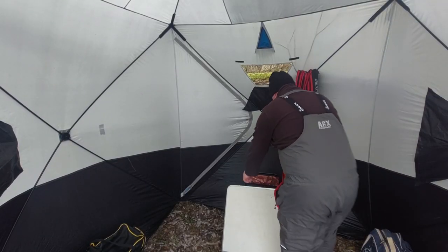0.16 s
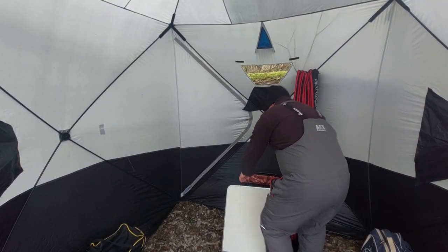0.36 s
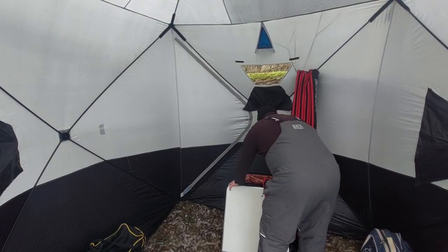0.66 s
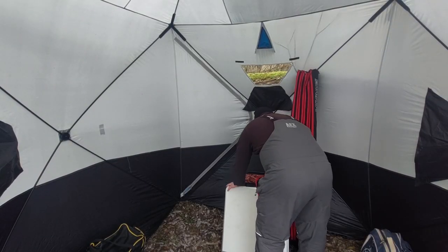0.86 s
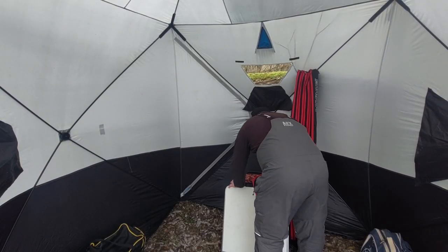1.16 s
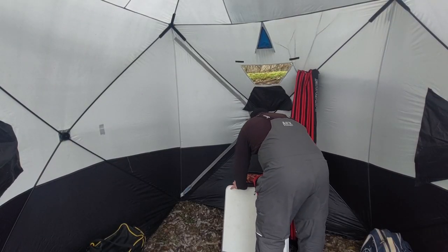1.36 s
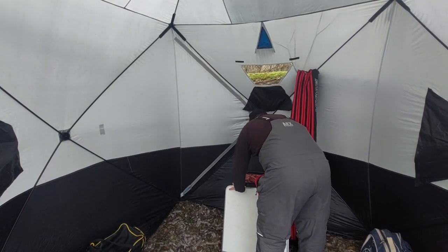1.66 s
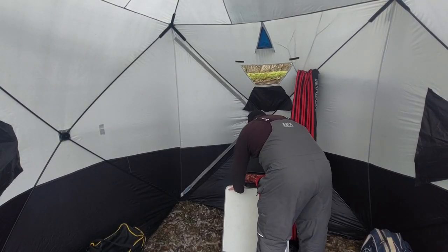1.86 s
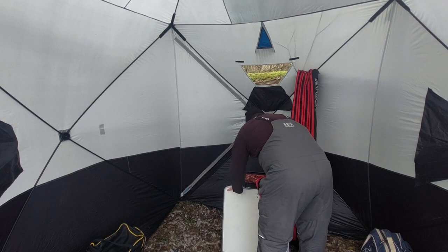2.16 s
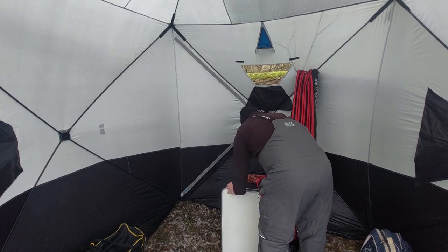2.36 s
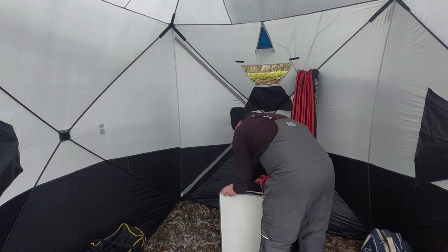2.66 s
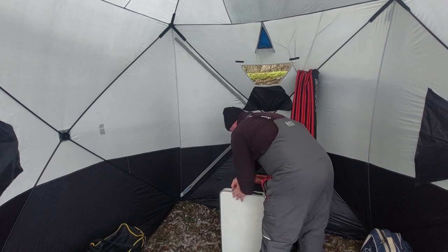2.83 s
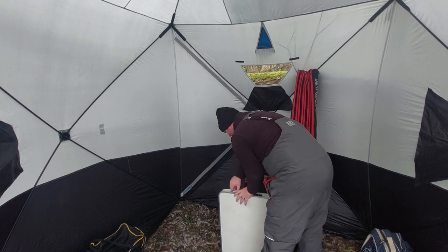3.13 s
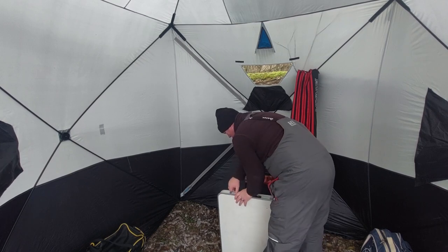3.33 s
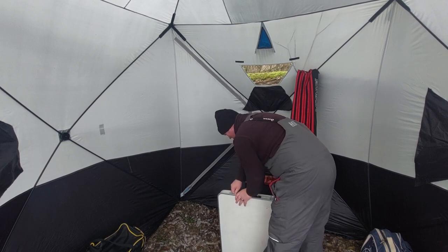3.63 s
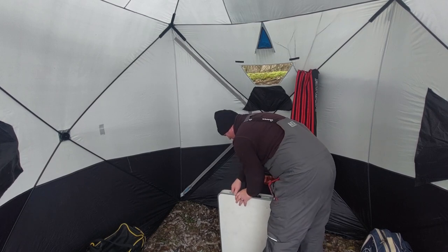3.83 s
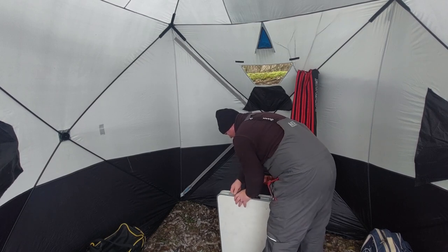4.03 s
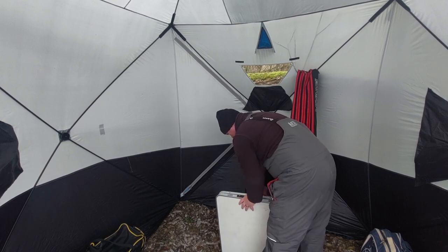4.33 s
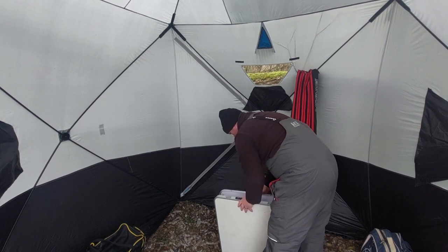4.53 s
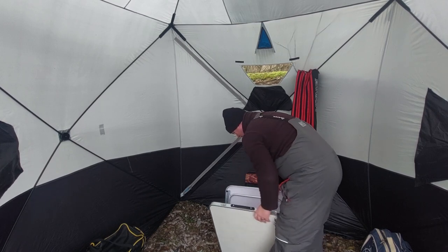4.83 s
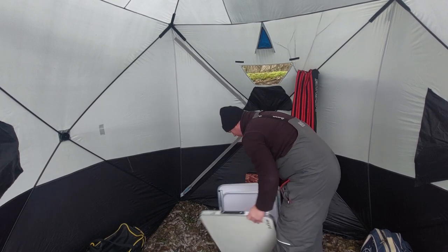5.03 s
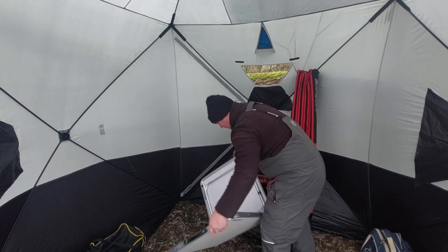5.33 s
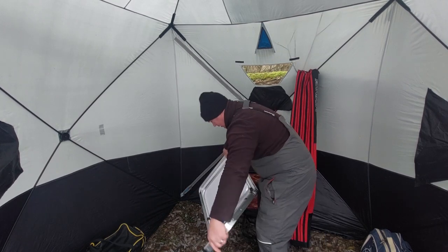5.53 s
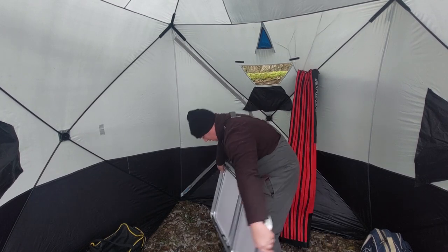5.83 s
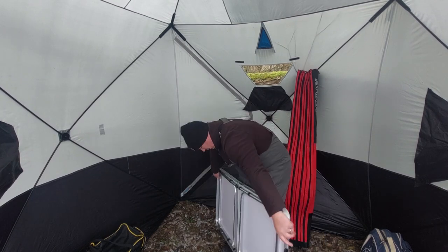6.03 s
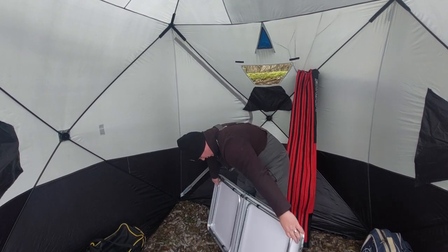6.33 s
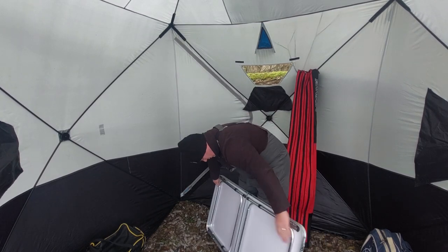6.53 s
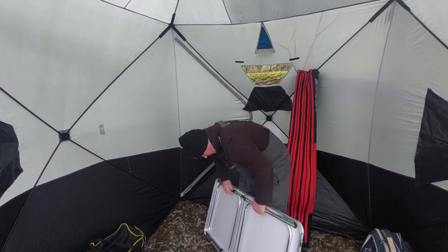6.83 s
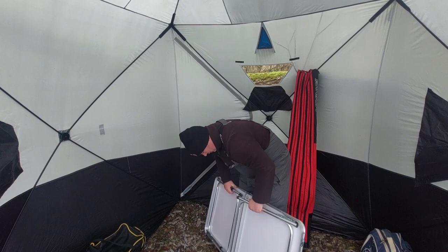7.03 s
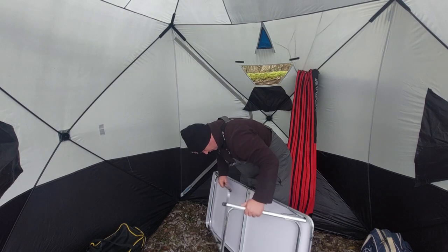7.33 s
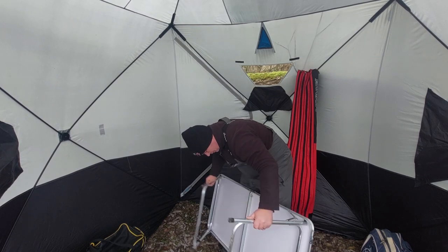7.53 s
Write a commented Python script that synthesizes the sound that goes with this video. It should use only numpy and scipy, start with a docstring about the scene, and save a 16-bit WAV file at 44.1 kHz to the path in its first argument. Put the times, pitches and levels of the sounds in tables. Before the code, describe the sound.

Inside a small tent, overalls swish and hands rub and knock hollow table panels. The folded table is set down with a dull double thud. After quiet fumbling its latch snaps loudly, the halves scrape open with a thin squeal and slam on their stops, then legs click and rattle. Close dry walls, near-mono camera microphone, very faint low background.

```python
"""Sleeves and hands brush and knock hollow panels, then a folded table is set down, unlatched and swung open in a tent.
Each blow is a set of decaying modes over bands of fading noise, with a short noise burst for the close fabric walls.
Cloth, hands and scraping edges are noise made of tiny slips; fittings click, and low noise swells as weight shifts.
Nearly mono over a faint floor; the right channel has a noise suppressor and the extreme treble differs between sides."""
import sys
import numpy as np
from scipy import signal
from scipy.fft import rfft, irfft, next_fast_len
from scipy.io import wavfile
from scipy.ndimage import uniform_filter1d

SR = 44100
rng = np.random.default_rng(int(sys.argv[2]) if len(sys.argv) > 2 else 0)


def unload_audio(sound):
    """Save the sound as a 16-bit wav file, at the path given as the first command line argument."""
    columns = np.transpose(np.atleast_2d(sound))
    # keep every value between -1 and 1, then stretch to whole-number steps
    steps = np.round(np.clip(columns, -1, 1) * 32767)
    wavfile.write(sys.argv[1], SR, steps.astype(np.int16))


N = 338688
TIME = np.arange(N) / SR


def undb(db):
    """Decibels to gain."""
    return np.exp(np.asarray(db) * np.log(10) / 20)


def unit(x):
    """Scale to rms 1."""
    return x / np.sqrt(np.mean(x ** 2))


def along(table):
    """Draw each column of a timed curve as automation, one value per sample."""
    s, *columns = np.transpose(table)
    return [np.interp(TIME, s, column) for column in columns]


def at_hz(points, hz):
    """Read (Hz, value) points on a log-frequency axis."""
    point_hz, value = np.transpose(points)
    return np.interp(np.log(np.maximum(hz, 1)), np.log(point_hz), value)


def colour(x, points):
    """EQ with the given (Hz, dB) curve, made minimum-phase so that nothing sounds early."""
    size = next_fast_len(len(x) + 4096, True) // 2 * 2
    curve_db = at_hz(points, np.fft.rfftfreq(size, 1 / SR))
    cepstrum = irfft(np.log(undb(curve_db)))
    # fold the cepstrum onto positive time
    cepstrum[1:size // 2] *= 2
    cepstrum[size // 2 + 1:] = 0
    response = np.exp(rfft(cepstrum))
    return irfft(rfft(x, size) * response)[:len(x)]


def band_filter(edges_hz, order):
    """Causal band-pass between two edges."""
    return signal.butter(order, edges_hz, "band", fs=SR, output="sos")


def resonance(x, hz, q):
    """One resonance with gain 1 at its centre."""
    b, a = signal.iirpeak(hz, q, fs=SR)
    return signal.lfilter(b, a, x)


def walk(rate):
    """Smooth random drift with spread near 1, taking a new direction `rate` times a second."""
    k = int(SR / rate)
    steps = np.repeat(rng.standard_normal(N // k + 1), k)
    return unit(uniform_filter1d(steps, k)[:N])


def add(track, s, sound):
    """Mix a sound in at a time."""
    i = int(s * SR)
    track[i:i + len(sound)] += sound[:N - i]


# tone of the faint floor: frequency_hz, level_db
FLOOR_TONE = [(20, -15.5), (55, 5.5), (100, 1), (180, -0.5), (350, -1), (800, -16), (2000, -31),
              (5000, -40.5), (10000, -24.5), (15000, -36)]
FLOOR_DB = -58.5


def faint_floor():
    """Steady noise, weighted to the bass."""
    return undb(FLOOR_DB) * unit(colour(rng.standard_normal(N), FLOOR_TONE))


def reflected(x):
    """Ground and walls add three early echoes whose paths drift as the body moves."""
    index = np.arange(N)
    out = x.copy()
    for lag_s in (.0017, .0041, .0083):
        lag = (lag_s * SR * (1 + .06 * walk(3))).astype(int)
        out += .25 * x[index - lag]
    return out


def friction(rate, spread_db, flutter_db, smear_s, wet):
    """Countless little slips of uneven size, in spurts; the tent walls smear each into a short hiss."""
    slipping = rng.random(N) < rate / SR
    size_db = spread_db * np.minimum(rng.exponential(size=N), 5)
    slips = slipping * rng.standard_normal(N) * undb(size_db)
    slips *= undb(flutter_db * walk(70))
    # each slip leaves an exponentially fading power that drives the hiss
    lingering = signal.lfilter([1], [1, -np.exp(-1 / (smear_s * SR))], slips ** 2)
    hiss = np.sqrt(lingering) * rng.standard_normal(N)
    return reflected(unit(slips) + wet * unit(hiss))


RELEASE_RATIO = 1.12  # a swell dies this much slower than it grows


def swells(base_db, events):
    """Gain of a base level plus (peak_s, swell_s, level_db) movements that grow, round off and die away."""
    power = undb(base_db) ** 2
    for s, swell_s, db in events:
        age = (TIME - s) / swell_s
        near = abs(age) < 10
        shape_age = np.minimum(age[near], age[near] / RELEASE_RATIO)
        power[near] += (undb(db) / np.cosh(shape_age)) ** 2
    return np.sqrt(power)


# tone of cloth, of hands rubbing and of the ground: frequency_hz, level_db
SWISH_TONE = [(400, -22), (750, -8.5), (1300, -10.5), (2000, -6.5), (3200, -6.5), (4300, -4), (5400, -10),
              (6600, -10.5), (8400, -11.5), (10400, -18.5), (12500, -30.5), (16000, -38)]
RUB_TONE = [(50, -18), (90, -11), (150, 2), (400, 0.5), (620, 3), (1150, -4), (1600, -4), (2400, -18),
            (4000, -73)]
GROUND_TONE = [(20, -18), (38, -17), (55, 2.5), (75, -0.5), (110, -41), (200, -45)]
# how busily the body moves: time_s, cloth_swish_db, hand_rub_db
EFFORT = [(0.0, -56.5, -55), (0.7, -53, -56.5), (1.1, -59, -56.5), (1.55, -58.5, -53.5), (1.82, -68, -68),
          (2.03, -67, -64), (2.22, -58, -59.5), (3.0, -62.5, -66), (3.45, -60, -66.5), (3.8, -57.5, -56.5),
          (4.05, -61.5, -58), (4.45, -61, -66), (4.62, -52, -63.5), (4.78, -46.5, -51), (5.3, -52.5, -59.5),
          (6.7, -53, -58.5), (7.1, -53.5, -67), (7.68, -50, -55)]
# single sweeps of a sleeve or hand: peak_s, swell_s, cloth_swish_db, hand_rub_db
STROKES = [(0.005, 0.0053, -47.5, -37.5), (0.314, 0.042, -39.5, -44), (0.445, 0.035, -41, -51.5),
           (0.598, 0.018, -39, -41), (0.655, 0.017, -45.5, -70), (1.625, 0.03, -50, -53),
           (2.36, 0.037, -58.5, -55), (2.78, 0.034, -61, -53), (2.9, 0.028, -56.5, -54.5),
           (3.095, .02, -60, -55.5), (4.978, 0.028, -40.5, -40.5), (5.46, 0.071, -48, -58),
           (5.819, 0.059, -43.5, -56), (5.9, 0.01, -47, -69), (6.61, 0.075, -50, -74),
           (6.815, 0.024, -45, -46), (6.915, 0.026, -36, -41.5), (7.21, 0.016, -49, -47),
           (7.368, 0.033, -37.5, -66), (7.513, 0.02, -36, -50)]
# weight of boots or table coming onto the ground: peak_s, swell_s, level_db
THUMPS = [(0.005, 0.072, -50), (0.375, 0.053, -45), (0.65, 0.023, -43), (1.485, .03, -46),
          (3.655, 0.016, -36.5), (5.04, 0.065, -48), (6.06, 0.063, -45.5), (6.38, 0.042, -37),
          (6.96, 0.055, -50.5)]
SHUFFLE_DB = -12  # steady rumble of the feet, relative to the rub of the hands


def handling():
    """Overalls swish and hands rub in tiny slips; low noise swells as the ground takes the weight."""
    swish_db, rub_db = along(EFFORT)
    swish_slips = friction(rate=4500, spread_db=2.5, flutter_db=1.4, smear_s=0.007, wet=1.34)
    rub_slips = friction(rate=700, spread_db=2.0, flutter_db=2.0, smear_s=0.016, wet=0.99)
    swish = unit(colour(swish_slips, SWISH_TONE))
    rub = unit(colour(rub_slips, RUB_TONE))
    tread = unit(colour(rng.standard_normal(N), GROUND_TONE))
    swish_strokes = [(s, swell_s, db) for s, swell_s, db, _ in STROKES]
    rub_strokes = [(s, swell_s, db) for s, swell_s, _, db in STROKES]
    return (swish * swells(swish_db, swish_strokes)
            + rub * swells(rub_db, rub_strokes)
            + tread * swells(rub_db + SHUFFLE_DB, THUMPS))


# fingertips shifting their grip at random; level relative to the rub of the hands
FINGERS_PER_S, FINGER_DB, FINGER_SPREAD_DB = 6, 0, 3.5
# soft skin leaves the treble quiet
FINGER_SPOT_HZ, FINGER_FALL_DB_PER_OCTAVE, FINGER_RISE_S = 700, 5, .004


def fingers():
    """Faint random taps of the grip, stronger when the hands are busy."""
    out = np.zeros(N)
    _, rub_db = along(EFFORT)
    for when, strength, spot in rng.uniform(-1, 1, (int(FINGERS_PER_S * N / SR), 3)):
        i = int(abs(when) * (N - 1))
        db = rub_db[i] + FINGER_DB + FINGER_SPREAD_DB * strength
        spot_hz = FINGER_SPOT_HZ * 2 ** (2 * spot)  # up to two octaves either way
        add(out, i / SR, tap(db, spot_hz, FINGER_FALL_DB_PER_OCTAVE, FINGER_RISE_S))
    return out


def tap(db, spot_hz, fall_db, rise):
    """A light contact, damped by the hands: the parts tuned nearest the struck spot answer most."""
    centres_hz = np.sqrt(np.multiply(PART_EDGES_HZ[:-1], PART_EDGES_HZ[1:]))
    parts_db = db - fall_db * abs(np.log2(centres_hz / spot_hz))
    return blow(parts_db, rise, spot_hz, spot_db=3, crack=37, early_db=6.0, modes_db=-32.5,
                longest_t60=0.21, size=SR // 8)


# hands and knees knocking on the hollow panels: start_s, level_db, struck_spot_hz, contact_rise_s
KNOCKS = [(0.052, -47.5, 1030, .002), (0.088, -49, 890, 0.0011), (0.167, -46, 1250, 0.00045),
          (0.461, -42, 1300, 0.0021), (0.721, -50, 260, 0.0014), (1.265, -41, 258, 0.0037),
          (1.274, -58, 1100, 0.0057), (1.322, -50.5, 900, 0.0014), (1.559, -42.5, 250, 0.011),
          (2.129, -53, 171, 0.003), (2.33, -43.5, 372, 0.0032), (3.296, -46, 234, 0.00096),
          (3.687, -36, 480, 0.0054), (4.025, -58, 960, 0.0013), (4.066, -56, 660, .004),
          (4.143, -39, 530, 0.00068), (4.412, -44.5, 171, 0.0017), (4.783, -46, 434, 0.002),
          (4.868, -43.5, 151, 0.0011), (5.133, -41.5, 175, 0.00023), (5.552, -49, 410, 0.00047),
          (6.67, -44, 404, 0.0025), (6.856, -43, 150, 0.0047), (6.982, -43.5, 150, .002),
          (7.04, -38, 326, 0.0024), (7.477, -34.5, 167, 0.0017)]
KNOCK_FALL_DB_PER_OCTAVE = 6.5
# catches, braces and leg tubes clicking:
# start_s, level_db, struck_spot_hz, fall_db_per_octave (away from the spot), contact_rise_s
CLICKS = [(1.313, -55, 4360, 23, 0.0022), (2.547, -62.5, 1510, 4, 0.00037), (3.544, -46, 2430, 4.5, .0008),
          (3.714, -49, 4360, 22, 0.0019), (3.84, -44, 6490, 3, 0.0033), (3.952, -49, 4910, 9.5, 0.0019),
          (4.113, -44.5, 5900, 4, 0.009), (4.463, -62, 4320, 3.5, .003), (4.542, -62, 4360, 0, 0.0019),
          (4.598, -56, 586, 4.5, .003), (4.693, -41, 4320, 4.5, 0.0038), (4.711, -41, 4380, 5.5, 0.021),
          (4.951, -42, 2930, 5, 0.00025), (4.968, -39.5, 4770, 8, 0.0013), (5.004, -39, 3130, 13, 0.0011),
          (5.318, -47, 4630, 6, 0.0013), (5.682, -53.5, 8900, 1.5, 0.0013), (6.656, -42.5, 4130, 5, 0.0017),
          (6.851, -39, 4170, 4.5, 0.0045), (6.98, -39.5, 1960, 2.5, 0.0024),
          (7.033, -45.5, 1970, 2.5, 0.0033), (7.119, -46, 4800, 5.5, 0.0012),
          (7.175, -35.5, 1500, 7, 0.002), (7.228, -37, 3400, 6, 0.0017), (7.345, -38, 5700, 3.5, 0.0011),
          (7.474, -39.5, 2340, 0.5, 0.0027), (7.507, -41, 13000, 11, .005)]


def taps():
    """Knocks on the panels and clicks of the metal fittings, each a short damped ring."""
    out = np.zeros(N)
    for s, db, spot_hz, rise in KNOCKS:
        add(out, s, tap(db, spot_hz, KNOCK_FALL_DB_PER_OCTAVE, rise))
    for s, db, spot_hz, fall_db, rise in CLICKS:
        add(out, s, tap(db, spot_hz, fall_db, rise))
    return out


# the halves sliding on each other: time_s, level_db
SLIDE = [(5.955, -50), (5.975, -24), (6.06, -27.5), (6.115, -29), (6.135, -34), (6.2, -36), (6.25, -33),
         (6.3, -40.5), (6.33, -46)]
# tone of the scraping edges: frequency_hz, level_db
SCRAPE_TONE = [(60, -15), (130, -0.5), (250, -12), (550, -6), (1200, -6.5), (2500, -7), (4600, -5),
               (5600, -10.5), (8500, -10), (10500, -22.5), (13000, -26.5), (16000, -45.5)]


def scrape():
    """The edges stick and slip only while the halves open, with a thin, broken metallic squeal."""
    slide_db, = along(SLIDE)
    sliding = (TIME > SLIDE[0][0]) & (TIME < SLIDE[-1][0])
    slips = friction(rate=2600, spread_db=2.4, flutter_db=1.2, smear_s=0.0061, wet=1.15)
    grind = unit(colour(slips, SCRAPE_TONE))
    squeal = unit(signal.sosfilt(band_filter([8680, 8880], 4), rng.standard_normal(N)))
    squeal *= np.exp(-((TIME - 6.125) / .065) ** 2)
    return sliding * (grind * undb(slide_db) + squeal * undb(-45 + 3 * walk(60)))


# clear modes of panels and frame, before weighting: frequency_hz, relative_level_db, t60_s
MODES = [(113.7, 3.5, 0.27), (157.9, 4, 0.53), (213.4, 0.5, 0.26), (247, -2.5, 0.33), (304, -4, 0.326),
         (424.7, 6.5, 0.25), (481, 11.5, 0.14), (563.5, 14, 0.098), (1116, 7, 0.18), (1227, 0.5, 0.22),
         (1690, 0, 0.068), (2190, 17, 0.071), (2564, 15, 0.09), (2680, 13.5, 0.08), (2730, 0, 0.074),
         (3867, 14.5, 0.14), (4100, 18, 0.076), (4460, 13.5, 0.2), (8100, 8, 0.14), (9500, -3, 0.17)]
# decay of the crowd of weaker modes: frequency_hz, t60_s
CROWD_T60 = [(100, 0.24), (250, 0.27), (560, 0.2), (1500, 0.14), (4000, 0.17), (10000, 0.19)]
CROWD_EDGES_HZ = np.geomspace(60, 16000, 7)
CROWD_FILTERS = [band_filter(edges, 3) for edges in zip(CROWD_EDGES_HZ, CROWD_EDGES_HZ[1:])]


def ringing(t, modes_db, longest_t60):
    """Free decay of the table: a few clear modes, randomly weighted per hit, over a crowd of weak ones."""
    hz, db, t60 = np.transpose(MODES)[:, :, None]
    sign, weight, detune = rng.standard_normal((len(MODES), 3)).T[:, :, None]
    fade_db = -60 * t / np.minimum(t60, longest_t60)
    phase = (2 * np.pi * hz * (1 + 0.0047 * detune) * t).astype(np.float32)
    clear = np.sign(sign) * undb(db + 2.7 * weight + fade_db) * np.sin(phase)
    centres_hz = np.sqrt(CROWD_EDGES_HZ[1:] * CROWD_EDGES_HZ[:-1])
    crowd_t60 = np.minimum(at_hz(CROWD_T60, centres_hz), longest_t60)
    noise = rng.standard_normal(len(t))
    crowd = sum(signal.sosfilt(f, noise) * undb(-60 * t / d) for f, d in zip(CROWD_FILTERS, crowd_t60))
    return crowd + undb(modes_db) * clear.sum(axis=0)


# tone of the ringing table before its parts are levelled: frequency_hz, level_db
TABLE_TONE = [(80, 9), (450, 3.5), (620, 5.5), (830, 3.5), (1250, -0.5), (1700, -3.5), (2500, -4.5),
              (4200, -4), (5400, -8), (6600, -5.5), (8400, -1), (10000, -5.5), (12000, -14.5), (16000, -26)]
# band edges of panel thud, panel knock, frame clack, tube ring and edge tick: edge_hz
PART_EDGES_HZ = [90, 350, 1300, 3200, 6000, 15000]
PART_FILTERS = [band_filter(edges, 4) for edges in zip(PART_EDGES_HZ, PART_EDGES_HZ[1:])]


def blow(parts_db, rise, spot_hz, spot_db, crack, early_db, modes_db, longest_t60, size):
    """A contact rings the table; the close walls throw it straight back, then everything dies away."""
    t = np.arange(size) / SR
    near_walls = rng.standard_normal(size) * (rng.random(size) < .25) * np.exp(-(t / .013) ** 4)
    sound = ringing(t, modes_db, longest_t60) + undb(early_db) * near_walls
    sound *= 1 - np.exp(-t / rise)
    # the harder the contact, the shorter its rise and the stronger its opening crack
    sound[0] += crack * np.exp(-rise / 0.0016)
    # the wave runs along the panel and returns from its edge, which makes the blow hollow
    lag = int(rng.uniform(.002, .006) * SR)
    sound[lag:] += .3 * sound[:-lag]
    sound = colour(sound + undb(spot_db) * resonance(sound, spot_hz, q=5.2), TABLE_TONE)
    # each part is levelled by its first 30 ms
    attack = int(.03 * SR)
    parts = [signal.sosfilt(f, sound) for f in PART_FILTERS]
    return sum(p * undb(db) / np.std(p[:attack]) for p, db in zip(parts, parts_db))


# blows on the table: start_s, panel_thud_db, panel_knock_db, frame_clack_db, tube_ring_db, edge_tick_db,
# contact_rise_s, struck_spot_hz
# in order: set down, rock onto the other corner; latch gives, snaps open; halves catch, break free,
# judder twice; first hinge stop, second hinge stop, frame settles
BLOWS = [(1.417, -32.5, -29.5, -38.5, -35.5, -51.5, 0.0027, 2550),
         (1.44, -38, -33.5, -45, -66, -66, 0.0066, 560), (3.593, -32.5, -22, -37, -46, -60, 0.0016, 149),
         (3.597, -28, -23, -23, -22, -26.5, 0.0012, 4100),
         (5.953, -41.5, -30.5, -42, -42, -55, 0.00059, 218),
         (5.957, -30, -36, -29.5, -27, -32, 0.00048, 7040),
         (6.004, -33, -29, -23.5, -40, -62, 0.0013, 2520),
         (6.044, -33.5, -31.5, -29, -33.5, -33, .0028, 4300),
         (6.3196, -28.5, -26, -19.5, -27.5, -35.5, 0.00066, 1730),
         (6.359, -48, -39, -19, -24.5, -31.5, 0.00027, 9700),
         (6.53, -62, -46.5, -34.5, -30, -35.5, 0.00031, 1940)]


def blows():
    """The case is set down, the latch snaps, the halves part and slam against their hinge stops."""
    out = np.zeros(N)
    for s, *parts_db, rise, spot_hz in BLOWS:
        sound = blow(parts_db, rise, spot_hz, spot_db=5.5, crack=8.4, early_db=-3.0, modes_db=-32.5,
                     longest_t60=0.54, size=SR // 3)
        add(out, s, sound)
    return out


def scene():
    """The table stands straight ahead, over a faint floor."""
    mono = faint_floor() + handling() + fingers() + taps() + scrape() + blows()
    return np.tile(mono, (2, 1))


# centres of the suppressor's overlapping bands: centre_hz
SUPPRESSOR_BANDS_HZ = [60, 200, 600, 1500, 4000, 9000]
# how slowly the suppressor's gain follows, slowest in the bass: frequency_hz, time_constant_s
OPENING_S = [(100, 0.028), (600, 0.016), (2000, 0.0028), (9000, 0.009)]
# depth is the share of a band removed when fully shut; margin is above the band's quietest level
SUPPRESSOR_DEPTH, SUPPRESSOR_MARGIN_DB, SUPPRESSOR_KNEE = 0.63, 7, 2.4


def suppress(x):
    """Noise suppressor: turn each band down while it is near its quietest level."""
    spectrum, hz, out = rfft(x), np.fft.rfftfreq(N, 1 / SR), x.copy()
    for centre_hz, weights in zip(SUPPRESSOR_BANDS_HZ, np.eye(len(SUPPRESSOR_BANDS_HZ))):
        band_weight = at_hz(list(zip(SUPPRESSOR_BANDS_HZ, weights)), hz)
        part = irfft(spectrum * band_weight, N)
        power = abs(uniform_filter1d(part ** 2, SR // 40))
        threshold = np.quantile(power[::100], .05) * undb(SUPPRESSOR_MARGIN_DB) ** 2
        shut = SUPPRESSOR_DEPTH / (1 + (power / threshold) ** SUPPRESSOR_KNEE)
        hold = np.exp(-1 / (at_hz(OPENING_S, centre_hz) * SR))
        out -= part * signal.lfilter([1 - hold], [1, -hold], shut)
    return out


AIR_SIDE_DB, TOP_HZ = -15, 15900


def record(dry):
    """The camera suppresses noise on the right only, takes more extreme treble on the left and cuts the top."""
    high_pass = signal.butter(4, 11500, "high", fs=SR, output="sos")
    air = undb(AIR_SIDE_DB) * signal.sosfiltfilt(high_pass, dry[0])
    channels = np.array([dry[0] + air, suppress(dry[1]) - air])
    top_cut = signal.ellip(8, .2, 70, TOP_HZ, fs=SR, output="sos")
    return signal.sosfilt(top_cut, channels)


dry = scene()
out = record(dry)
unload_audio(out)
```